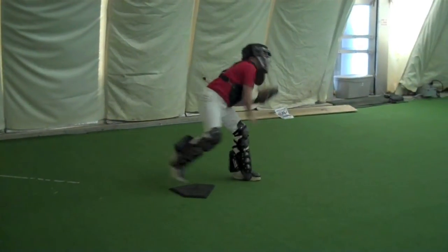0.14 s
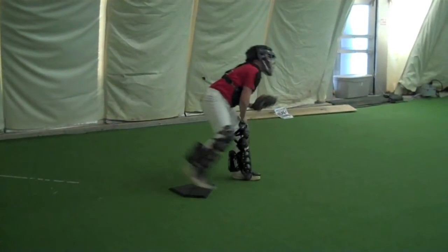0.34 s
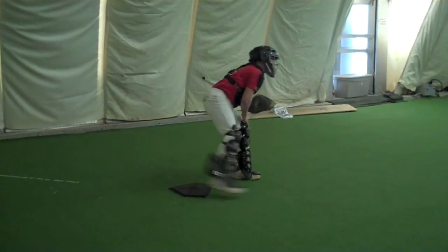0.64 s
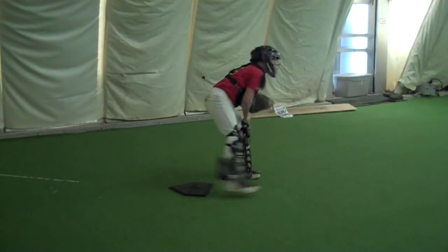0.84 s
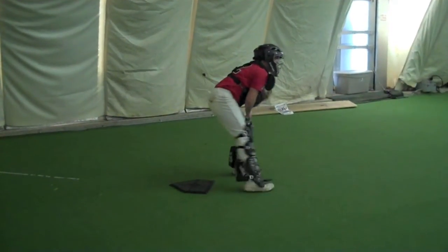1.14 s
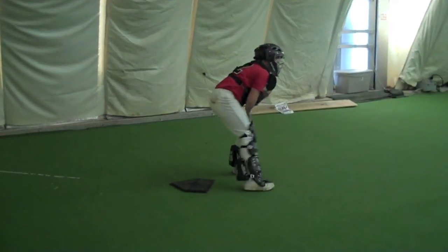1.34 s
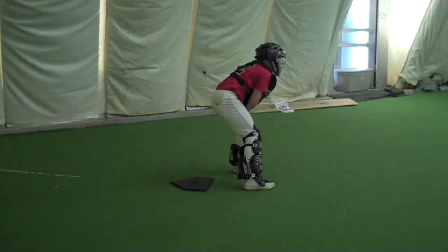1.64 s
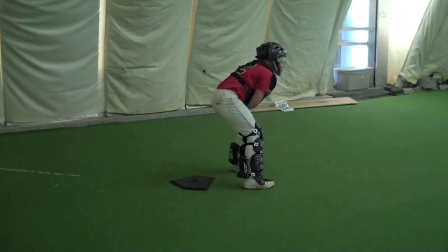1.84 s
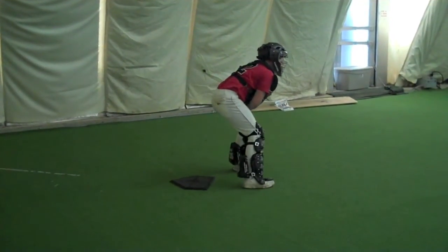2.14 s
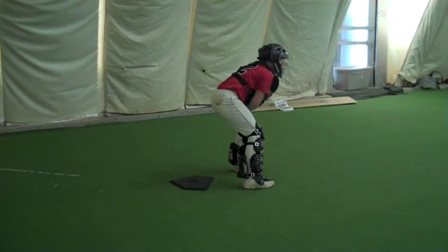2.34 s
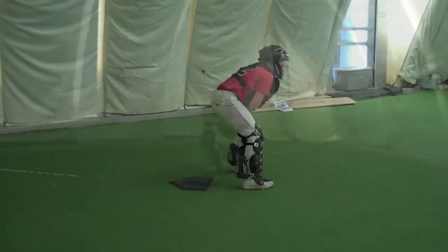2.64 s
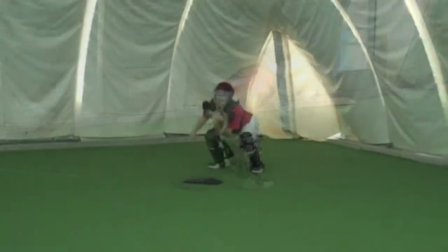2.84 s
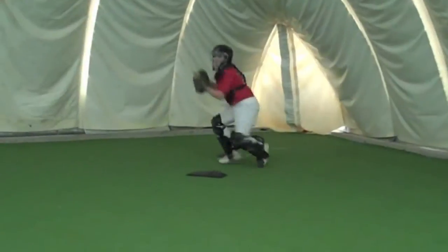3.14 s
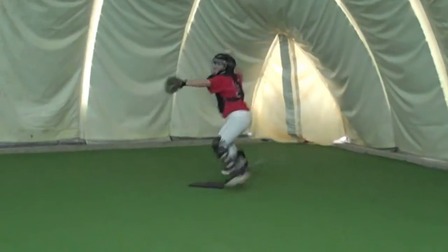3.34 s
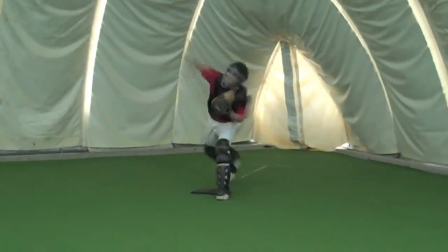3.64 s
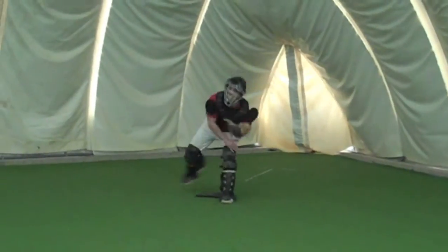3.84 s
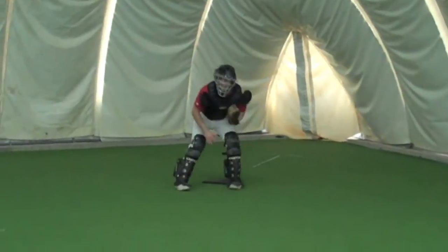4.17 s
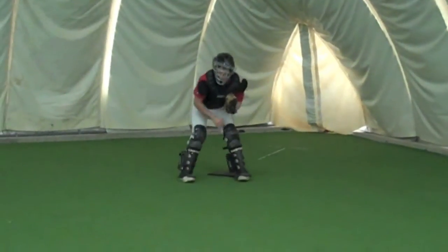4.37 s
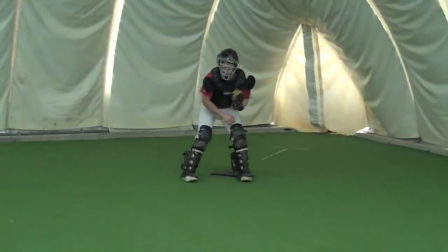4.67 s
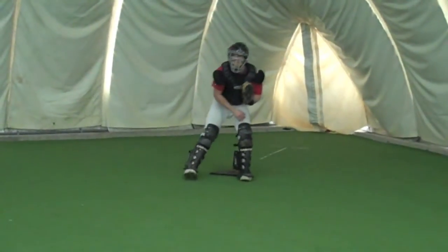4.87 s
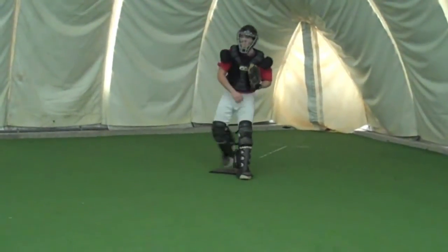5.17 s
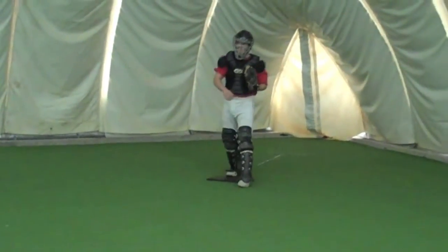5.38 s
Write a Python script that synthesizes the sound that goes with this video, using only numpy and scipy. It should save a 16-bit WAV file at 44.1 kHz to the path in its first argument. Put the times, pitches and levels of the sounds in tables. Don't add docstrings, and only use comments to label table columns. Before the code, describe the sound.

Deep slow-motion rumble with a dull click gives way to a ball popping into leather, gear rustle, and a far ringing bat hit.

```python
import sys
import numpy as np
from scipy import signal
from scipy.fft import rfft, irfft, next_fast_len
from scipy.io import wavfile
from scipy.ndimage import uniform_filter1d, minimum_filter1d, map_coordinates

SR = 44100
rng = np.random.default_rng(int(sys.argv[2]) if len(sys.argv) > 2 else 0)


def put_to_file(sound):
    columns = np.atleast_2d(sound).T
    safe = np.clip(columns, -1, 1)
    whole_steps = np.round(safe * 32767)
    wavfile.write(sys.argv[1], SR, whole_steps.astype(np.int16))


def elevation(decibels):
    levels = np.asarray(decibels, float)
    return 10 ** (levels / 20)


N = 242991
TIME = np.arange(N) / SR
SLOW = 1 / 4


def at_hz(points, hz):
    table_hz, values = np.transpose(points)
    return np.interp(np.log(hz), np.log(table_hz), values)


def drift(rate_hz):
    knots = rng.standard_normal(400)
    return map_coordinates(knots, [TIME * rate_hz % 399], order=2)


# pitch_hz, left_over_right_db
LEFT_PORT = [(60, -7.5), (110, 2), (200, -0.5), (370, -0.5), (680, -0.5), (1240, -1), (2280, 2), (4180, -2),
             (7670, 4.5), (14100, 11)]


def bands(spectrum, likeness, speed, start=0):
    size = next_fast_len(N - start)
    hz = np.maximum(np.fft.rfftfreq(size, 1 / SR), 1)
    mid, side = rfft(rng.standard_normal((2, size)))
    alike = np.clip(at_hz(likeness, hz / speed), -1, 1)
    ports = elevation(np.outer([.5, -.5], at_hz(LEFT_PORT, hz / speed)))
    colour = elevation(at_hz(spectrum, hz)) * (hz < spectrum[-1][0])
    both = np.sqrt(1 + alike) * mid + np.sqrt(1 - alike) * side * [[1], [-1]]
    both = both * ports * colour / np.sqrt(2 * np.mean(colour ** 2))
    for centre_hz in 16 * 2 ** np.arange(0, 10.5, .5):
        share = np.clip(1 - 2 * np.abs(np.log2(hz / centre_hz)), 0, 1)
        yield centre_hz, irfft(both * share, size)[:, :N - start]


# pitch_hz, likeness (1 same, -1 opposite)
ECHO_LIKENESS = [(60, 0.9), (130, 0.98), (290, 0.95), (620, 0.98), (1360, 0.74), (2960, 0.24),
                 (6450, -0.15), (14100, -0.9)]


def bunches(rows, spectrum, t60s, speed):
    start = max(int(rows[0][0] * SR), 0)
    start_s, level_db, rise_s, t60_s, pan_db, tilt_db = np.transpose(rows)[:, :, None]
    age = np.maximum(TIME[start:] - start_s, 0)
    swell = 1 - np.exp(-age / rise_s)
    power = (elevation(level_db - 60 * age / t60_s) * swell) ** 2
    sides = elevation(np.outer([1, -1], pan_db))
    out = 0
    for hz, band in bands(spectrum, ECHO_LIKENESS, speed, start):
        weights = sides * elevation(2 * tilt_db.T * np.log2(hz / speed / 2000))
        air_loss = elevation(-60 * age[0] / at_hz(t60s, hz))
        out = out + band * np.sqrt(weights @ power) * air_loss
    return np.pad(out, ((0, 0), (start, 0)))


def dome(echoes, tilt, field):
    rows = []
    for k, (start_s, level_db, t60_s, pan_db) in enumerate(echoes):
        rise_s = 0.082 * t60_s ** 1.295
        tilt_db = tilt[k > 0] + .15 * abs(pan_db)
        rows.append((start_s, level_db, rise_s, t60_s, pan_db, tilt_db))
    start_s, level_db, rise_s, tilt_db = field
    return rows + [(start_s, level_db, rise_s, 60, 0, tilt_db)]


# start_s, level_db, t60_s, left_right_db
REPLAY_ECHOES = [
    (-.089, -15.5, 1.12, 0),
    (.038, -14.5, 0.62, 0),
    (.12, -29, .23, 0),
]
# pitch_hz, level_db (per Hz)
REPLAY_MITT = [(35, -28.5), (60, -9.5), (92, -9), (139, -3), (232, -3), (266, -5), (395, -7), (493, -4),
               (566, -9.5), (1880, -20), (3600, -52), (4680, -88.5), (7920, -120)]
# pitch_hz, t60_s
REPLAY_T60 = [(60, 8.5), (150, 4.96), (350, 7.96), (700, 5.23), (1500, 3.42), (3500, 1.5)]


def replay_catch():
    echoes = dome(REPLAY_ECHOES, (.7, .4), (-0.1, -26.5, 0.11, -0.65))
    return bunches(echoes, REPLAY_MITT, REPLAY_T60, SLOW)


# pitch_hz, likeness
LIKENESS = [(60, 1), (130, 0.96), (290, 0.98), (620, 0.92), (1360, 0.77), (2960, 0.53), (6450, 0.15),
            (14100, 0.049)]


def blower(spectrum, level_db, speed, patchy_db):
    roar = 0
    for _, band in bands(spectrum, LIKENESS, speed):
        roar = roar + band * elevation(patchy_db * drift(8.0 * speed))
    return elevation(level_db) * roar


# pitch_hz, level_db (per Hz)
REPLAY_BLOWER = [(8.8, -34), (15, -1), (48, -8), (108, -13.5), (174, -25.5), (252, -25), (317, -28),
                 (427, -43.5), (479, -35.5), (740, -46), (1440, -50.5), (1730, -48), (3600, -67),
                 (4680, -107), (7920, -120)]


def replay_blower():
    return blower(REPLAY_BLOWER, -36, SLOW, patchy_db=1.0)


def ring(clicks, hz, t60_s):
    r, w = elevation(-60 / (t60_s * SR)), 2 * np.pi * hz / SR
    return signal.lfilter([0, np.sin(w)], [1, -2 * r * np.cos(w), r * r], clicks + 1e-18)


def tick(peak_db, hz, cycles, rebound_ms, speed):
    click, t60_s = np.zeros(2000), cycles / hz
    hits = np.arange(4)
    click[hits * round(rebound_ms / speed * SR / 1000)] = elevation(peak_db) * (-.7) ** hits
    body = ring(click, hz, t60_s) + 0.77 * ring(click, .62 * hz, t60_s * 4.0)
    return body + .22 * ring(click, 1.25 * hz, t60_s * 3.5) + .05 * ring(click, 2.2 * hz, t60_s * 2.5)


# pitch_hz, level_db (per Hz)
GEAR = [(240, -38), (400, -25), (1010, -16.5), (2200, -28), (2760, -19), (4590, -18.5), (7740, -12.5),
        (9690, -28), (14300, -42)]
# pitch_hz, t60_s
DRY_T60 = [(100, 500), (14000, 500)]


def gear(rustle, contacts, speed, grain_db):
    spectrum = [(hz * speed, db) for hz, db in GEAR]
    rubs = []
    for start_s, level_db, t60_s, tilt_db in rustle:
        rubs.append((start_s, level_db, 0.052 * t60_s, t60_s, 1.5 * speed, tilt_db))
    out = bunches(rubs, spectrum, DRY_T60, speed) * elevation(grain_db * drift(60 * speed))
    for ticks, cycles, rebound_ms in contacts:
        for start_s, peak_db, hz in ticks:
            at = round(start_s * SR)
            out[:, at:at + 2000] += tick(peak_db, hz, cycles, rebound_ms, speed)
    return out


# start_s, level_db, t60_s, tilt_db (per octave)
REPLAY_RUSTLE = [
    (.85, -47.5, .9, 0.65),
    (.985, -45.5, 0.09, 2.3),
    (1.056, -38, .09, .1),
    (1.1, -50, .18, .6),
    (1.14, -60, .1, 1.2),
    (1.25, -58.5, 0.94, 1.7),
    (1.62, -59, .2, 1.5),
]
# start_s, peak_db, pitch_hz
REPLAY_TICKS = [
    (1.0563, -28.5, 1600),
    (1.15, -43, 1700),
]
# start_s, peak_db, pitch_hz
REPLAY_CREAKS = [
    (.6954, -60, 5150),
    (.9906, -53, 1870),
    (1.0021, -47.5, 1830),
    (1.1179, -50, 1650),
    (2.3, -62, 4900),
    (2.4294, -63, 5450),
]


def replay_gear():
    return gear(REPLAY_RUSTLE, [(REPLAY_TICKS, 8, .66), (REPLAY_CREAKS, 32, .07)], SLOW, grain_db=6.0)


# pitch_hz, level_db (per Hz)
BLOWER = [(12, -43), (20, -14.5), (107, 2), (176, -1), (273, -10), (447, -11), (775, -20), (1050, -15.5),
          (1170, -21.5), (2090, -23), (3330, -29), (7000, -33.5), (7810, -31), (10600, -56), (14300, -39.5)]


def live_blower():
    return blower(BLOWER, -42.5, 0.88, patchy_db=1.14)


# pitch_hz, t60_s
DOME_T60 = [(250, 1.54), (700, 1.65), (1400, 1.93), (2500, 1.3), (5000, 0.73), (8000, 0.55), (13000, 0.56)]


def blow(direct, echoes, spectrum, modes):
    crack = bunches(echoes, spectrum, DOME_T60, 1)
    slaps, strikes = np.zeros((2, 2, N))
    for k, (start_s, slap_db, ringing_db, pan_db) in enumerate(direct):
        at = round(start_s * SR)
        sides = elevation([pan_db / 2, -pan_db / 2])
        slaps[:, at] = elevation(slap_db) * sides * (-1) ** k
        strikes[:, at] = elevation(ringing_db) * sides
    slap_band = signal.butter(2, [400, 8000], "band", fs=SR, output="sos")
    out = crack + signal.sosfilt(slap_band, slaps + 1e-18)
    for hz, level_db, t60_s in modes:
        out = out + elevation(level_db) * ring(crack + strikes, hz, t60_s)
    return out


# start_s, slap_db, ringing_db, left_right_db
MITT_DIRECT = [
    (2.9118, -21, 16, -2),
    (2.9128, -15, 15, -3),
    (2.9146, -6.5, 1, -8),
    (2.934, -30, 14, 0),
]
# start_s, level_db, t60_s, left_right_db
MITT_ECHOES = [
    (2.9105, -12.5, 0.028, 1.5),
    (2.921, -12, 0.068, 2.5),
    (2.931, -15, 0.045, 0),
    (2.944, -17.5, .075, 2.5),
    (2.99, -40, .13, 10),
    (3.0, -20.5, .36, 0),
]
# pitch_hz, level_db (per Hz)
MITT = [(88, -54), (150, -40), (361, -14), (559, -7.5), (730, -14), (954, -7), (1480, -5), (2380, -12.5),
        (7620, -10.5), (9770, -30), (14300, -46)]
# pitch_hz, level_db, t60_s
POCKET = [
    (418, -37.5, 0.025),
    (597, -39.5, 0.022),
    (1110, -35, 0.014),
    (1470, -38, 0.0053),
    (3150, -35.5, 0.0048),
]


def mitt_smack():
    echoes = dome(MITT_ECHOES, (.6, -1.6), (2.93, -30.5, .02, -3.2))
    return blow(MITT_DIRECT, echoes, MITT, POCKET)


# start_s, level_db, t60_s, tilt_db (per octave)
RUSTLE = [(3.2, -51.5, 0.14, 3), (3.22, -41.5, 0.16, 1.5), (3.28, -55, .3, 1.5), (3.43, -34, .2, -5.5),
          (3.455, -44.5, 0.35, .1), (3.56, -44.5, 1.1, -0.3), (3.72, -37.5, 0.33, -3),
          (3.78, -57, .55, 2.5), (4.135, -46, 0.23, .1), (4.255, -50, .1, 2.5), (4.54, -55, .14, 4.5),
          (5.31, -55, .2, 2.5)]
# start_s, peak_db, pitch_hz
TICKS = [
    (3.7269, -48, 6400),
    (3.9544, -45, 7100),
    (4.136, -39, 4360),
    (4.1614, -47, 5340),
    (4.1825, -52, 5400),
    (4.2492, -38, 4600),
]
# start_s, peak_db, pitch_hz
STEPS = [
    (3.433, -37, 758),
    (3.454, -34, 800),
    (3.745, -47.5, 883),
]


def live_gear():
    return gear(RUSTLE, [(TICKS, 12, .7), (STEPS, 8, 8)], 0.96, grain_db=1.5)


# start_s, slap_db, ringing_db, left_right_db
BAT_DIRECT = [
    (4.737, -21, 21, 2),
    (4.7455, -22, 22, 1),
    (4.798, -25, 21, -0.66),
]
# start_s, level_db, t60_s, left_right_db
BAT_ECHOES = [
    (4.735, -10.5, 0.085, 0),
    (4.743, -7, .16, -0.5),
    (4.755, -8.5, .07, -3),
    (4.771, -14, 0.12, 12),
    (4.788, -5.5, 0.18, 0),
    (4.806, -3, .12, -3),
    (4.823, -5, .22, 8),
    (4.845, -10, .08, -6.5),
    (4.92, -6.5, 0.48, .1),
]
# pitch_hz, level_db (per Hz)
BAT = [(120, -47), (200, -29), (324, -17.5), (354, -19.5), (439, -8), (584, -7), (639, -9), (1510, -4.5),
       (2400, -13), (2670, -5), (3740, -11.5), (7650, -5.5), (14300, -36.5)]
# pitch_hz, level_db, t60_s
BARREL = [
    (1415, -60, 0.088),
    (1558, -51, 0.14),
    (2077, -46, 0.16),
    (2594, -48, .85),
    (2636, -48, 0.095),
    (7550, -32, 0.014),
]


def bat_ping():
    echoes = dome(BAT_ECHOES, (-0.66, 0.58), (4.78, -11.5, 0.06, 0.34))
    return blow(BAT_DIRECT, echoes, BAT, BARREL)


def camera(x, speed, hiss_db, from_hz, full_hz, keep_db, mask_db):
    size, top_hz = round(2048 / speed), 14300 * speed
    overlap = size * 3 // 4
    hiss = elevation(hiss_db) * signal.lfilter([1, -.6], [1], rng.standard_normal(x.shape))
    hz, _, z = signal.stft(x + hiss, SR, nperseg=size, noverlap=overlap)
    power = np.abs(z) ** 2
    spent = np.pad(power.sum(axis=(0, 1)), (17, 0))[:-17]
    thinning = elevation(np.interp(hz, [from_hz, full_hz], [-9, keep_db]))[:, None]
    neighbours = np.sqrt(uniform_filter1d(power, size=16, axis=1))
    threshold = thinning * (neighbours + elevation(mask_db) * spent)
    treble = power[:, (hz > full_hz) & (hz < top_hz)].sum(axis=(0, 1))
    attack = treble > 3 * minimum_filter1d(treble, size=5, origin=2)
    kept = (np.abs(z) > threshold) | (hz < from_hz)[:, None] | attack
    below_top = (hz < top_hz)[:, None] | attack & (hz < 1.06 * top_hz)[:, None]
    return signal.istft(z * kept * below_top, SR, nperseg=size, noverlap=overlap)[1][:, :N]


def scene():
    replay = replay_catch() + replay_blower() + replay_gear()
    live = live_blower() + mitt_smack() + live_gear() + bat_ping()
    replay = camera(replay, SLOW, -56, from_hz=2101, full_hz=2703, keep_db=2, mask_db=-72)
    live = camera(live, 1, -62.5, from_hz=8400, full_hz=9900, keep_db=3.5, mask_db=-68)
    mix = np.interp(TIME, [2.584, 3.203], [0, 1])
    return replay * (1 - mix) + live * mix


def band_limit(x):
    return signal.sosfilt(signal.butter(12, 14660, fs=SR, output="sos"), x)


def record(dry):
    return band_limit(dry)


dry = scene()
out = record(dry)
put_to_file(out)
```